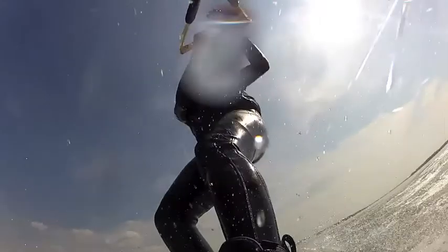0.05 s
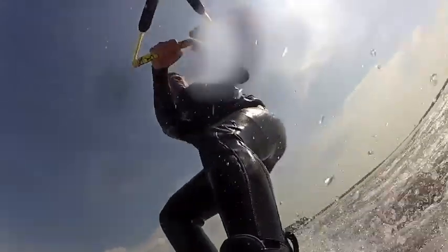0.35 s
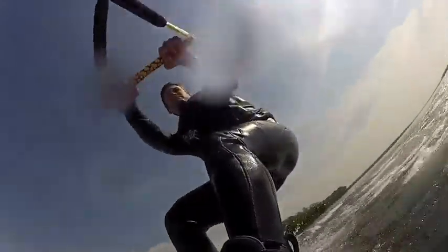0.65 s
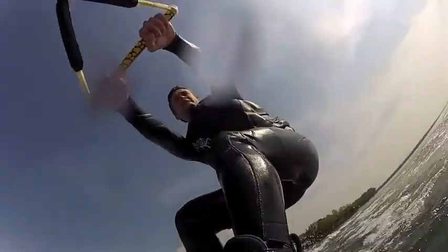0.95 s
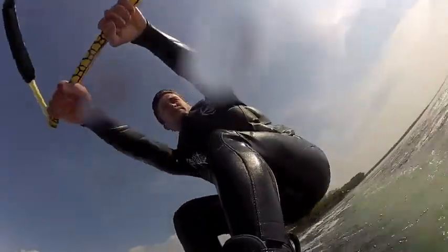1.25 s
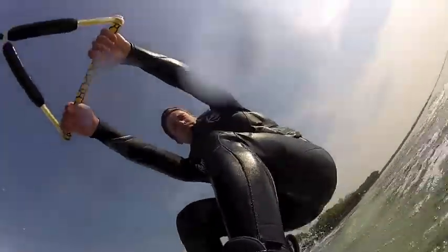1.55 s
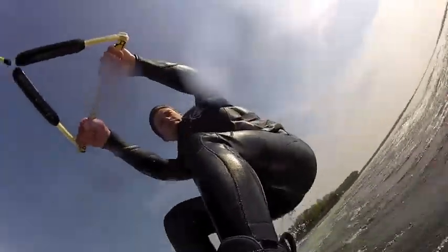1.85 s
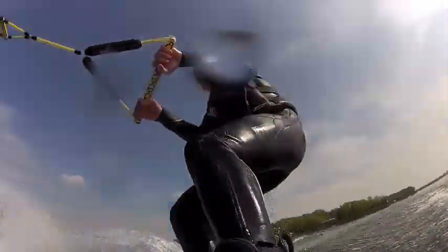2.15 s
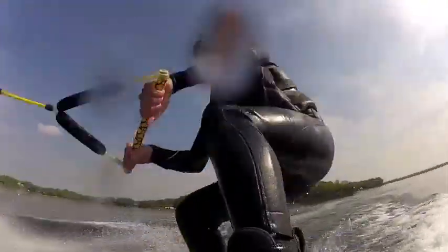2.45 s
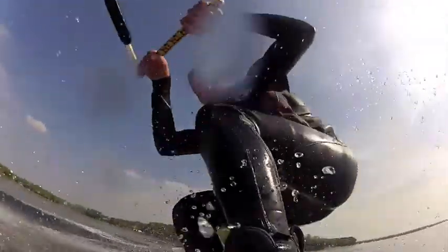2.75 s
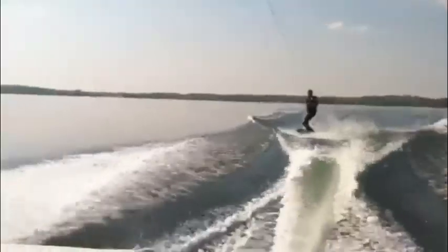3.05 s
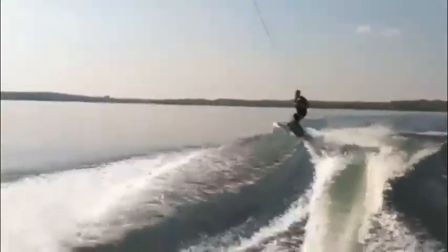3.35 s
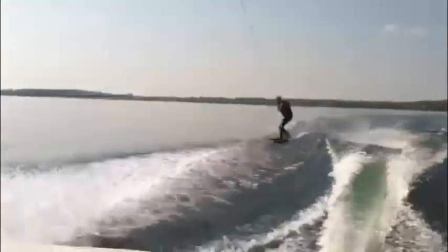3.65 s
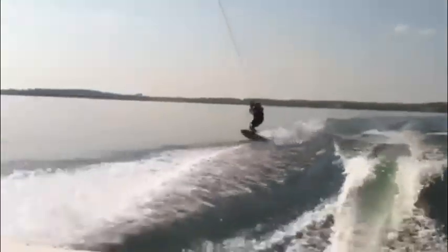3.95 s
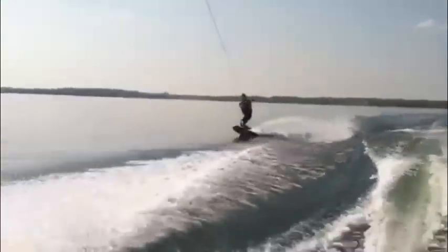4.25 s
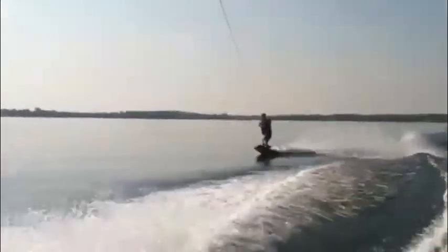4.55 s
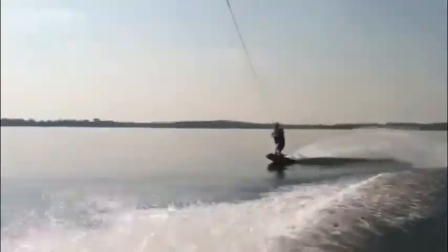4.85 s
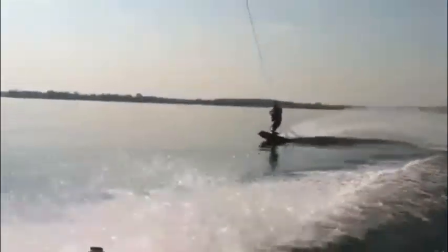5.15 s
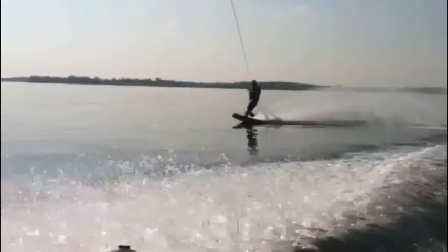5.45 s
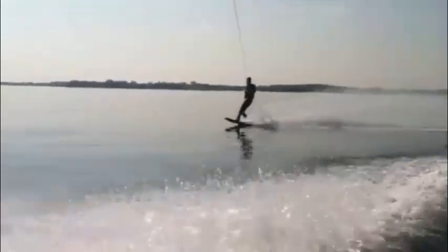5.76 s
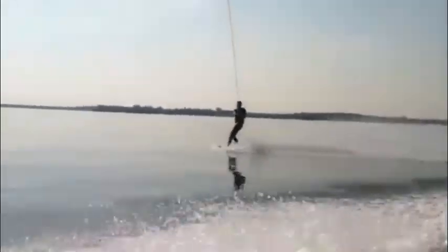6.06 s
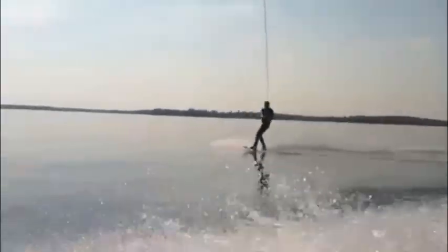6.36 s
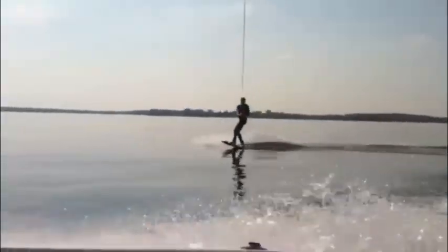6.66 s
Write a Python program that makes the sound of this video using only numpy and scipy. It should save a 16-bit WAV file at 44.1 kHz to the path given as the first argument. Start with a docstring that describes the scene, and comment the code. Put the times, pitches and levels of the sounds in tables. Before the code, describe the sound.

From the start, a wakeboard rumbles and drums over lake chop, heard from a cased microphone on the board. Uneven booming slaps with dull splashes land throughout, strongest at the very start and near 0.1, 1.3 and 2.2 seconds. Spray crackles on the case, slugs of water give short ringing knocks, sharpest near 1.5 and 2 seconds, and a few drops plink. The big hits overload the microphone. The ride calms around 2.6 seconds, with one last crack at 2.9.

At 3 seconds the sound drops away and the stern of the tow boat quickly fades in. The engine drones steadily under a strong, high gear whine, over churning wake and hissing spray. The whine rises slightly in pitch around 3.6 seconds, gradually softens, dips just after 6 seconds, and continues with the engine and wash until about 7 seconds.

```python
"""A wakeboard thumps and drums over lake chop, heard from a cased camera riding on it. Spray crackles
on the case, slugs of water knock it into a short ring, drops plink, and the big hits overload the mic.
Near 3 s a quick fade leads to a second shot, at the stern of the tow boat: a V8 drones under a strong
gear whine, over the churn and hiss of the wake."""
import sys
import numpy as np
from scipy import signal
from scipy.fft import rfft, irfft, next_fast_len
from scipy.io import wavfile
from scipy.ndimage import uniform_filter1d, minimum_filter1d

SR = 44100
rng = np.random.default_rng(int(sys.argv[2]) if len(sys.argv) > 2 else 0)


def int16_out(signal):
    """Quantize to a 16-bit WAV file."""
    q = np.round(np.clip(np.atleast_2d(signal).T, -1, 1) * 32767)
    wavfile.write(sys.argv[1], SR, q.astype(np.int16))


N = 304290
T = np.arange(N) / SR
WHINE_ORDER, FIRING_ORDER = 48, 8   # multiples of the four-stroke cycle rate

# the board slapping the water: t/s, relative peak/dB
SLAPS = [(0.008, 6), (0.123, 2), (0.383, 1), (0.426, -3), (0.4811, 0), (0.795, -3.5), (1.015, -3.5),
         (1.113, -3), (1.307, 2), (1.878, -4), (1.96, -3), (2.192, 0.5), (2.353, -1), (2.451, -7.5)]
# ringing modes of the camera case: f/Hz, width/Hz, gain/dB
CASE_MODES = [(620, 145, -4.5), (890, 100, -4.5), (1160, 280, -10.5), (1705, 217, -3.5), (1946, 134, 0.5),
              (2533, 380, -12), (3377, 120, -15.5), (3676, 164, -18)]
# the engine's strong partials: multiple of the cycle rate, rms level/dB
ENGINE_ORDERS = [(5, -37), (8, -29), (10, -38), (14, -42), (15, -42), (17, -40), (18, -43), (20, -35),
                 (21, -43), (22, -42), (24, -40), (26, -36), (28, -46), (29, -45), (38, -41), (42, -48),
                 (44, -45), (50, -45), (52, -46), (58, -48), (66, -49), (72, -47), (78, -49), (92, -47),
                 (98, -48), (108, -51)]


def board(spray_db, skip_db):
    """Chop rattles the board, wavelets heave and slap it; the rush beneath swells with the spray."""
    # ride over the chop: t/s, heave level/dB, relative drumming level/dB
    chop = [(0.0, -8, -14), (0.28, -20, -7), (0.45, -17.5, -14.5), (0.67, -19, -17), (0.74, -10.5, -13.5),
            (1.05, -15, -13), (1.5, -16, -15.5), (1.8, -12.5, -15.5), (1.97, -13, -10), (2.09, -20, -19),
            (2.4, -18, -12.5), (2.54, -17, -31), (2.62, -25, -32), (2.76, -24, -25), (2.87, -23, -20),
            (2.93, -25, -27)]
    # wavelet crests lifting the board: t/s, level/dB
    bumps = [(0.1, -14), (0.38, -4), (0.765, -10), (0.91, -12), (1.165, -3), (1.235, -6), (1.33, 0.5),
             (1.45, -6), (1.49, -6.5), (1.645, -2.5), (1.865, -7), (2.01, -3.5), (2.22, -7.5),
             (2.305, -4.5), (2.35, -5), (2.47, -1), (2.555, -14), (2.66, -16)]
    # modes of the board and camera mount: f/Hz, width/Hz, gain/dB
    board_modes = [(170.3, 13, 2), (223.5, 76, -22.5)]
    # low-end spectrum of the bouncing board: f/Hz, relative level/dB
    heave_spectrum = [(12, -18), (22, 7), (35, 1.5), (54, 12.5), (68, 2.5), (90, -9), (130, -14),
                      (300, -63.5)]
    # spectrum of water rushing under the board: f/Hz, relative level/dB
    rush_spectrum = [(100, -3), (170, 2.5), (240, 6), (310, 3), (375, -18.5), (520, -14), (800, -18),
                     (1500, -41)]
    heave_db, drum_db = in_time(chop)
    crest_times, bump_db = np.transpose(bumps)
    bump_power = swells(crest_times, from_db(bump_db) ** 2, half_s=0.016)
    lift = np.sqrt(from_db(heave_db + 0.5) ** 2 + bump_power)
    heave = lift * evened(coloured(rng.standard_normal(N), heave_spectrum), span_s=0.035)
    rattle = evened(resonate(impacts(per_s=900, spread_db=4), board_modes), span_s=0.04)
    drum = from_db(drum_db + 1.13 - 1.66 * skip_db) * rattle
    rush_db = -25.5 + 0.54 * (spray_db + 27) + 2.8 * drift(8.8)
    rush = from_db(rush_db) * coloured(rng.standard_normal(N), rush_spectrum)
    drumming = lowpass(drum + thumps(board_modes), edge_hz=355, order=4)   # the mount passes only lows
    return heave + rush + drumming + smacks()


def thumps(modes):
    """Each slap is a soft 4 ms push that sets the board booming."""
    times, peak_db = np.transpose(SLAPS)
    force, push = np.zeros(N), np.hanning(SR // 250)
    force[(times * SR).astype(int)] = from_db(peak_db - 1)
    full_swing = np.abs(resonate(np.pad(push, (0, SR // 10)), modes)).max()
    return resonate(np.convolve(force, push)[:N], modes) / full_swing


def smacks(gain_db=-15.5, attack_s=0.0016, decay_s=0.011):
    """Water squeezed out under each slap gives a short, dull splash."""
    # spectrum of the wet smack: f/Hz, relative level/dB
    smack_spectrum = [(150, -17), (280, 9), (450, -10), (700, 1), (1200, -13.5), (2000, -18), (4000, -39.5)]
    level, t = np.zeros(N), T[:SR // 5]
    envelope = np.exp(-t / decay_s) * (1 - np.exp(-(t / attack_s) ** 2))
    for s, peak_db in SLAPS:
        at = int(s * SR)
        level[at:at + len(t)] += from_db(peak_db + gain_db) * envelope
    return level * coloured(rng.standard_normal(N), smack_spectrum)


def knocks(chatter_hz=1864, pitch_spread=0.063):
    """A slug of water makes the case chatter near its main mode for a few ms, with a sharp crack."""
    # slugs hitting the case: t/s, relative ring peak/dB, relative crack level/dB, length/s
    slugs = [(0.085, -18.5, -48, 0.0037), (0.384, -6, -45, 0.0066), (0.415, -9.5, -50, 0.0056),
             (0.4434, -14, -54, .004), (0.481, -10, -48, 0.0036), (0.533, -9, -50, 0.0042),
             (0.5866, -4, -48, 0.0036), (0.684, -11.5, -48, 0.0045), (0.766, -12, -44, 0.0049),
             (0.938, -10.5, -44, .003), (0.9654, -5.5, -36, 0.0041), (1.016, -23, -37, .004),
             (1.029, -11.5, -35, 0.0056), (1.091, -6, -45, .004), (1.123, -19, -46, 0.0016),
             (1.151, -22, -34, .003), (1.235, -10.5, -43, 0.0085), (1.39, -20, -45, 0.004),
             (1.5201, 2.5, -26, .003), (1.591, -9.5, -52, 0.0046), (1.6034, -11, -46, 0.0077),
             (1.663, -15, -29.5, 0.0052), (1.879, -7, -39, 0.0057), (1.886, -6, -46, 0.0044),
             (2.0268, -2, -30, 0.0037), (2.084, -8.5, -48, 0.0048), (2.184, -14.5, -46, 0.0052),
             (2.2962, -24, -55, .004), (2.437, -23, -35, 0.0028), (2.5014, -26, -30, 0.0026),
             (2.93, -6.5, -24.5, 0.0063), (2.9467, -17, -25, 0.0029)]
    out, t = np.zeros(N), T[:SR // 20]
    crack_band = signal.butter(1, [2000, 10000], "band", fs=SR, output="sos")
    for s, peak_db, crack_db, length_s in slugs:
        push = np.exp(-(t / length_s) ** 4)
        rattle, burst = rng.standard_normal((2, len(t))) * push
        hz = chatter_hz * (1 + pitch_spread * rng.standard_normal())
        ring = resonate(0.36 * push * np.sin(2 * np.pi * hz * t) + rattle, CASE_MODES)
        crack = from_db(crack_db + 3.5) * signal.sosfilt(crack_band, burst)
        at = int(s * SR)
        out[at:at + len(t)] += from_db(peak_db + 2.5) * ring / np.abs(ring).max() + crack
    return out


def spray(spray_db):
    """Soft drops patter on the case in clumps and set it ringing; hard ones add bright ticks."""
    # spectrum of the ticks: f/Hz, relative level/dB
    tick_spectrum = [(2000, -16), (4000, -7), (5500, -15), (7500, -27), (9000, 30), (15000, -9)]
    patter = lowpass(impacts(per_s=1800, spread_db=2.5), edge_hz=6500, order=2)
    clumps = from_db(2.28 * drift(29))
    ring = evened(resonate(patter * clumps, CASE_MODES), span_s=0.25)
    ticks = coloured(impacts(per_s=590, spread_db=8.5), tick_spectrum)
    return from_db(spray_db - 0.5) * (ring + from_db(-29) * ticks)


def plinks(decay_s=0.00135, glide=4.1, roughness=0.028):
    """A drop traps a bubble, whose ring wobbles and rises a little as it dies."""
    # single bubbles: t/s, peak/dB, starting f/Hz
    bubbles = [(0.647, -29, 4000), (1.056, -12.5, 2530), (1.702, -16.5, 2550), (1.934, -20, 3170),
               (2.809, -34, 5780)]
    out, t = np.zeros(N), T[:SR // 20]
    envelope = t / decay_s * np.exp(1 - t / decay_s)
    for s, peak_db, hz in bubbles:
        wobble = 2 * np.pi * roughness * np.cumsum(rng.standard_normal(len(t)))
        phase = 2 * np.pi * hz * t * (1 + glide * t) + lowpass(wobble, edge_hz=900, order=2)
        at = int(s * SR)
        out[at:at + len(t)] += from_db(peak_db) * envelope * np.sin(phase)
    return out


def camera_overload(x, limit_db=2.5, hold_s=0.0055, ceiling=0.97, jitter_samples=1.48, jitter_hz=12000):
    """A fast limiter ducks on bass hits, the input clips, and a wobbling clock adds a thin sizzle."""
    hold = int(hold_s * SR)
    bass = np.abs(lowpass(x, edge_hz=230, order=2))
    gain = np.minimum(1, from_db(limit_db) / (bass + 1e-9))
    limited = x * uniform_filter1d(minimum_filter1d(gain, hold), hold)
    clipped = limited / (1 + np.abs(limited / ceiling) ** 16) ** (1 / 16)
    sizzle = jitter_samples * np.gradient(clipped) * np.cos(2 * np.pi * jitter_hz * T)
    return clipped + sizzle


def engine(cycle_phase, whine_db):
    """Uneven cylinders drone at multiples of the cycle rate; the gears whine over them."""
    drone = np.zeros(N)
    for order, db in ENGINE_ORDERS:
        level = from_db(db + 1.94 * drift(4.5))
        drone += level * np.sin(order * cycle_phase + 0.059 * drift(3.9) + rng.uniform(0, 2 * np.pi))
    gear_phase = WHINE_ORDER * cycle_phase
    whine = from_db(whine_db + 0.55 * drift(21)) * np.sin(gear_phase + 0.1 * drift(36))
    octave = from_db(-41.5 + 2 * drift(25)) * np.sin(2 * gear_phase + 0.92 * drift(4.3))
    return np.sqrt(2) * (drone + whine + octave) + from_db(-35) * clatter(cycle_phase)


def clatter(cycle_phase, odd_db=-4, db_per_order=-0.15):
    """Valves and pistons tick alike on every cycle, filling in weak partials between the strong ones."""
    order = np.arange(2049)
    strong = [k for k, _ in ENGINE_ORDERS] + [WHINE_ORDER, 2 * WHINE_ORDER]
    weak = (order > 11) & (order < 150) & ~np.isin(order, strong)
    levels = weak * from_db(db_per_order * order + odd_db * (order % 2))
    cycle = irfft(levels * np.exp(2j * np.pi * rng.random(len(order))))
    position = cycle_phase / (2 * np.pi) % 1
    return unit_rms(np.interp(position, np.linspace(0, 1, len(cycle)), cycle))


def wake(cycle_phase):
    """Water churns, throbbing with the exhaust, and fine spray hisses as it falls back."""
    # wash behind the boat: t/s, relative churn level/dB, hiss level/dB
    wash = [(3.1, -26.5, -36), (3.7, -26.5, -36.5), (4.3, -27.5, -36.5), (5.0, -27, -35), (5.7, -27, -34.5),
            (6.3, -27, -35.5), (6.9, -28.5, -36.5)]
    # spectrum of churning water and wet exhaust: f/Hz, relative level/dB
    churn_spectrum = [(20, -46), (45, -32), (75, -12.5), (105, -9), (150, 0), (225, 5), (300, -1.5),
                      (480, -4.5), (700, -10.5), (1050, -9), (1600, -13), (2200, -13), (3200, -49),
                      (6000, -57)]
    # spectrum of the falling spray: f/Hz, relative level/dB
    hiss_spectrum = [(1470, -18), (2500, 0.5), (3740, -5.5), (5180, -3), (6140, -8), (7280, -3), (8700, -7),
                     (9780, -11), (12800, -18.5), (14700, -25), (15900, -38)]
    churn_db, hiss_db = in_time(wash)
    throb = 1 + 0.25 * np.cos(FIRING_ORDER * cycle_phase)
    churn_gain = from_db(churn_db + 2 + 1.22 * drift(11.6))
    churn = coloured(throb * rng.standard_normal(N), churn_spectrum)
    hiss_gain = from_db(hiss_db + 0.5 * drift(21))
    hiss = coloured(impacts(per_s=20000, spread_db=1.5), hiss_spectrum)
    return churn_gain * churn + hiss_gain * hiss


def impacts(per_s, spread_db):
    """Random clicks, many small and a few large."""
    sizes = from_db(spread_db * np.minimum(rng.exponential(1, N), 5)) * rng.choice([-1, 1], N)
    return sizes * (rng.random(N) < per_s / SR)


def resonate(force, modes):
    """Ring a body: damped modes in parallel, alternating in polarity."""
    out = 0
    for k, (hz, width, db) in enumerate(modes):
        r, w = np.exp(-np.pi * width / SR), 2 * np.pi * hz / SR
        ring = signal.lfilter([0, (1 - r * r) * np.sin(w)], [1, -2 * r * np.cos(w), r * r], force + 1e-18)
        out = out + (-1) ** k * from_db(db) * ring
    return out


def coloured(x, spectrum):
    """EQ a steady sound with a spectrum curve, at unit rms."""
    hz, db = np.transpose(spectrum)
    size = next_fast_len(N)
    bin_hz = np.maximum(np.arange(size // 2 + 1) * SR / size, 1)
    gain = from_db(np.interp(np.log(bin_hz), np.log(hz), db))
    return unit_rms(irfft(rfft(x, size) * gain, size)[:N])


def lowpass(x, edge_hz, order):
    """Roll off the treble above an edge."""
    return signal.sosfilt(signal.butter(order, edge_hz, fs=SR, output="sos"), x)


def evened(x, span_s):
    """Hold the level steady over spans longer than span_s."""
    size = int(span_s * SR)
    power = uniform_filter1d(uniform_filter1d(x * x, size), size)
    return x / np.sqrt(np.abs(power) + 1e-12)


def drift(rate_hz):
    """Smooth random modulation at unit rms, mostly slower than rate_hz."""
    hop, run_in = 40, 2000
    r = np.exp(-2 * np.pi * rate_hz * hop / SR)
    slow = signal.lfilter([1], [1, -2 * r, r * r], rng.standard_normal(N // hop + run_in + 2))[run_in:]
    return np.interp(np.arange(N) / hop, np.arange(len(slow)), unit_rms(slow))


def swells(times, heights, half_s):
    """A bell-shaped rise and fall around each moment, summed."""
    marks = np.zeros(N)
    marks[(times * SR).astype(int)] = heights
    t = np.arange(-(SR // 8), SR // 8 + 1) / SR
    return np.abs(signal.oaconvolve(marks, np.exp(-(t / half_s) ** 2), "same"))


def in_time(rows):
    """Turn timed breakpoints into one automation curve per column."""
    times, *columns = np.transpose(rows)
    return [np.interp(T, times, column) for column in columns]


def from_db(db):
    """Decibels to gain."""
    return 10 ** (np.asarray(db) / 20)


def unit_rms(x):
    """Scale to unit rms."""
    return x / np.sqrt(np.mean(x ** 2) + 1e-20)


def scene():
    """The shot on the board drops away and the shot from the boat fades in."""
    # the board skips clear, lulling spray and drumming: t/s, spray dip/dB
    skips = [(0.068, 7), (0.51, 7.5), (0.57, -1), (0.662, 9), (0.995, 3.5), (1.19, 1), (1.277, 7),
             (1.359, 13.5), (1.563, 12.5), (2.145, 1.5), (2.235, 5)]
    # spray thrown onto the case: t/s, relative level/dB
    spray_curve = [(0.0, -22.5), (0.4, -24.5), (0.6, -27), (0.75, -22), (0.87, -27), (1.06, -22),
                   (1.2, -27.5), (1.3, -23), (1.45, -27.5), (1.7, -26.5), (1.95, -22.5), (2.18, -26.5),
                   (2.35, -30), (2.6, -39.5), (2.9, -27.5)]
    # gear whine, locked to engine speed: t/s, f/Hz, level/dB
    whine_curve = [(3.08, 1039, -20.5), (3.39, 1042, -23.5), (3.61, 1059, -19.5), (3.77, 1069, -19),
                   (4.43, 1074, -20.5), (4.55, 1067, -20), (6.0, 1071, -24), (6.15, 1063, -28),
                   (6.9, 1071, -24.5)]
    skip_db = swells(*np.transpose(skips), half_s=0.017)
    spray_db = in_time(spray_curve)[0] - skip_db
    whine_hz, whine_db = in_time(whine_curve)
    cycle_hz = whine_hz / WHINE_ORDER * (1 + 0.000693 * drift(2.69))
    cycle_phase = 2 * np.pi * np.cumsum(cycle_hz) / SR
    on_board = camera_overload(board(spray_db, skip_db) + spray(spray_db) + knocks() + plinks())
    at_stern = engine(cycle_phase, whine_db) + wake(cycle_phase)
    fade_out = np.interp(T, [2.89, 2.95, 2.955, 2.98], [0.99, 1, 0.15, 0.017])
    fade_in = np.interp(T, [2.98, 3.096], [0, 1])
    return (on_board * fade_out + at_stern * fade_in)[None]


def record(dry):
    """The treble rolls off, with a steep cut above 15.2 kHz."""
    dull = lowpass(dry, edge_hz=13900, order=3)
    return signal.sosfilt(signal.ellip(10, 0.1, 90, 15200, fs=SR, output="sos"), dull)


dry = scene()
out = record(dry)
int16_out(out)
```